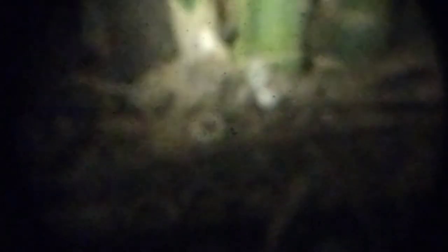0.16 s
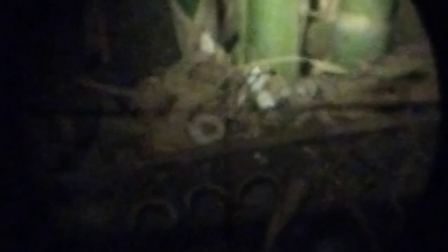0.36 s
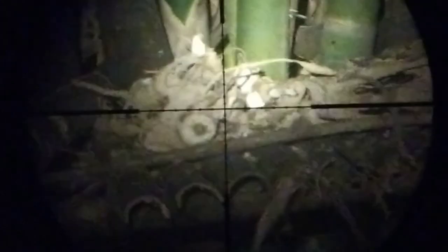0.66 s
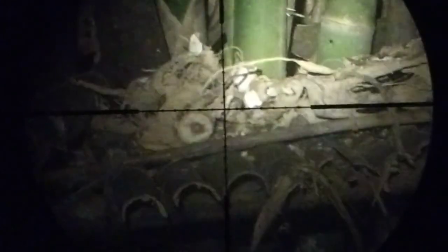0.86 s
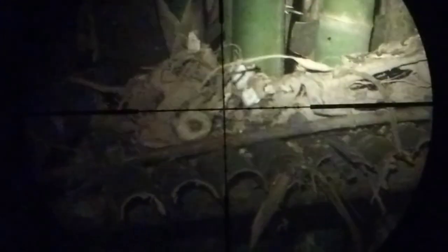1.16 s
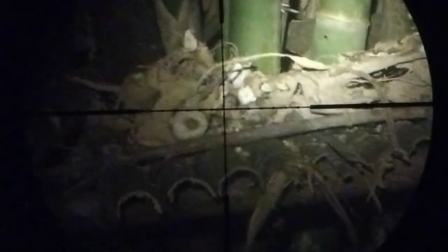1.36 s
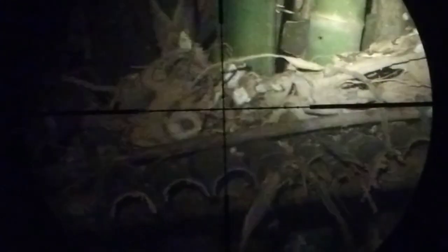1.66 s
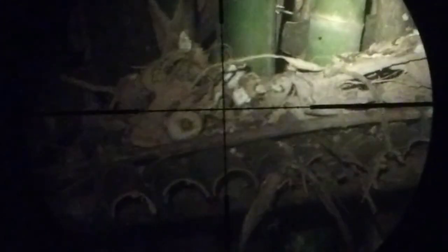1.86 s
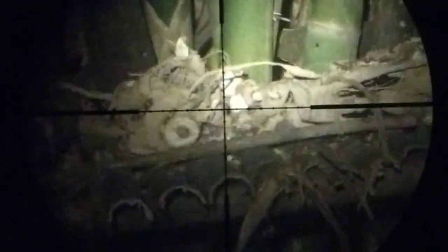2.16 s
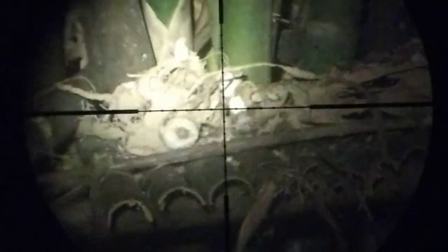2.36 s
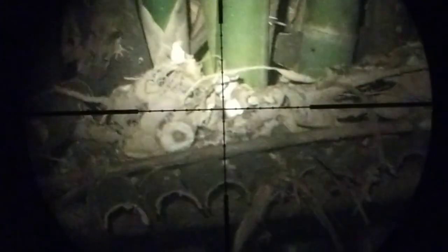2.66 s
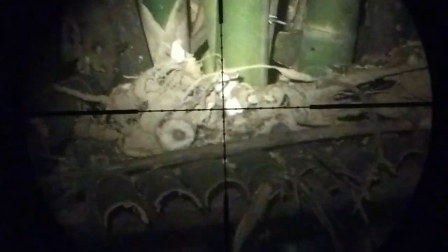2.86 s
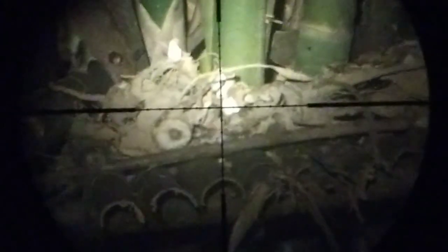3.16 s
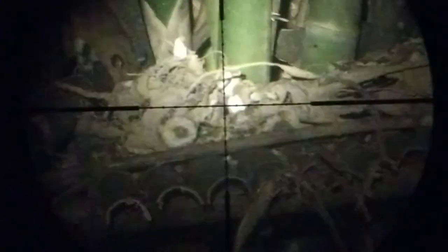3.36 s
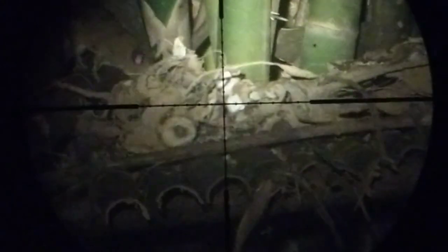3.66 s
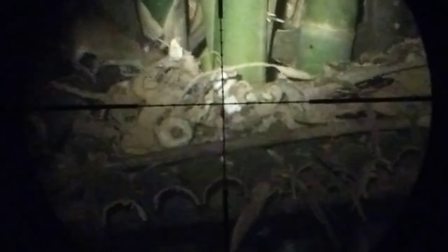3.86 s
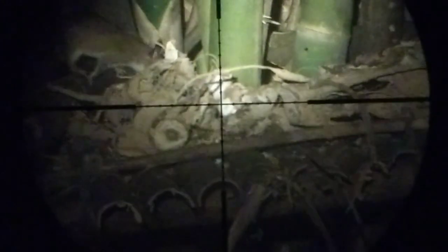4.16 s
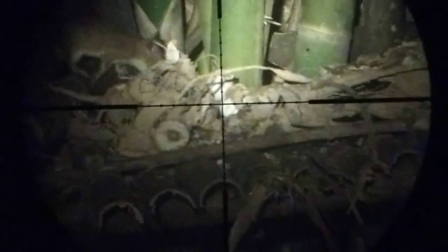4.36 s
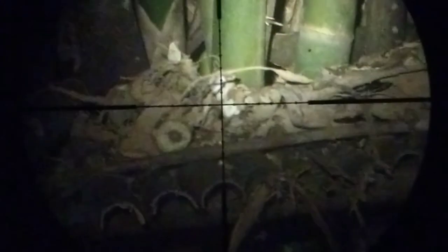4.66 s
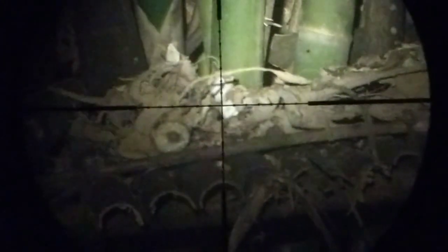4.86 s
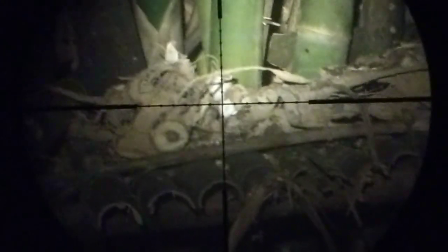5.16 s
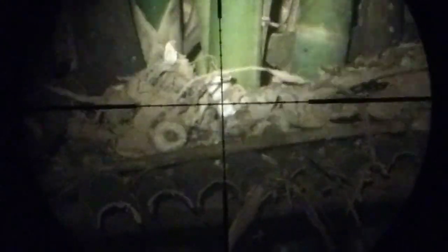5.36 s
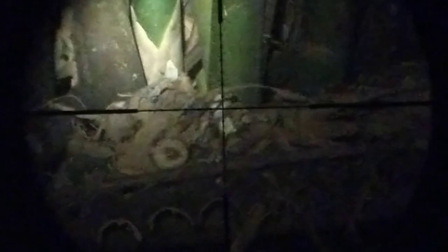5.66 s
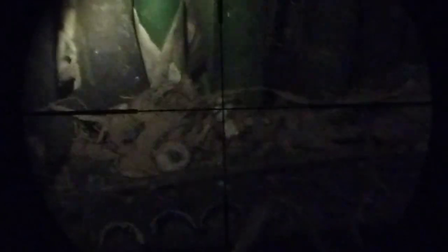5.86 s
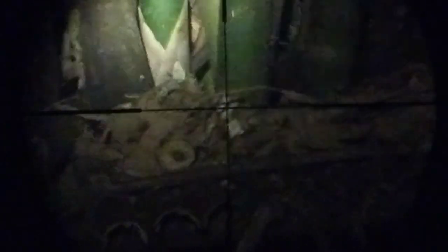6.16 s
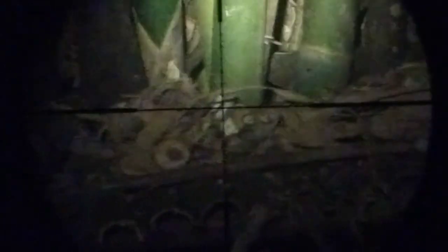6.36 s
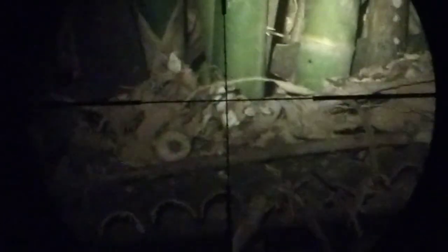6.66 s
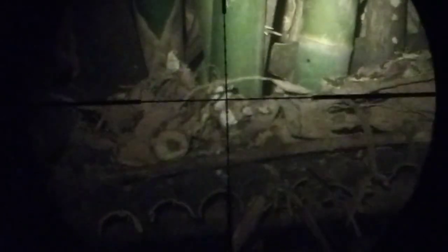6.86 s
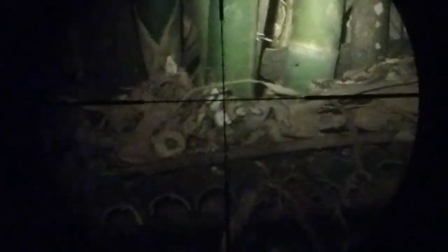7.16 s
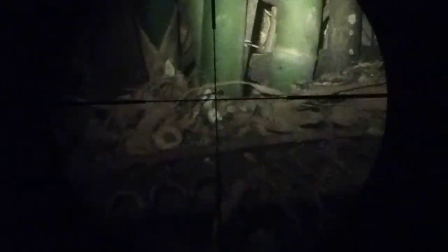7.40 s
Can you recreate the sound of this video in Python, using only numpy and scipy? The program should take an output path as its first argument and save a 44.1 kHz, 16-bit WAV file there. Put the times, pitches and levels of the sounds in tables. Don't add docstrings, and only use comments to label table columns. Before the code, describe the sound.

A night garden full of insects runs unbroken from 0 to about 7.5 seconds, over faint air and microphone hiss. Two cicadas dominate, each giving fast, dry, rattling chirps of about eight to ten strokes, swelling and stopping, centred around 4.5 to 5 kHz. One repeats every 0.55 seconds, the other slightly slower, so they alternate, overlap and separate again. Below, crickets make soft pure trills near 2.5 kHz, the nearest in paired short phrases; above, a katydid's thin rasp throbs near 7.7 kHz. Stems and walls scatter a short echo. Close, dull handling ticks on a rifle come at 0.05, 0.56 and, softer and lower, 2.2 seconds. A faint touch at 5.5 leads to sharp knocks at 5.6 and 5.67, the latter loudest; a last thudding tick falls at 7.0. The insects continue unchanged to the end.

```python
import sys
import numpy as np
from scipy import signal
from scipy.fft import rfft, irfft
from scipy.io import wavfile
from scipy.ndimage import uniform_filter1d

SR = 44100
rng = np.random.default_rng(int(sys.argv[2]) if len(sys.argv) > 2 else 0)


def voltage_ratio(level):
    return 10 ** (np.asarray(level, float) / 20)


def persist_wave(psi):
    counts = np.round(np.clip(psi, -1, 1) * 32767).astype(np.int16)
    wavfile.write(sys.argv[1], SR, np.atleast_2d(counts).T)


N = 332073
TIME = np.arange(N) / SR


def level(x, db):
    return x * voltage_ratio(db) / np.sqrt(np.mean(x ** 2))


def colour(points, size=2048):
    hz, db = np.transpose(points)
    grid = np.maximum(np.arange(size // 2 + 1) * SR / size, 1)
    cepstrum = irfft(np.log(voltage_ratio(np.interp(np.log(grid), np.log(hz), db))))
    cepstrum[1:size // 2] *= 2
    cepstrum[size // 2 + 1:] = 0
    return irfft(np.exp(rfft(cepstrum)))


def through(x, response):
    return signal.fftconvolve(x, response)[:N]


def band(x, low_hz, high_hz):
    return signal.sosfilt(signal.butter(8, [low_hz, high_hz], "band", fs=SR, output="sos"), x)


def clicks(times, gains):
    return np.bincount(np.clip((times * SR).astype(int), 0, N - 1), gains, N)


def walk(rate):
    hold = int(SR / rate)
    held = np.repeat(rng.standard_normal(N // hold + 1), hold)
    return 1.3 * uniform_filter1d(uniform_filter1d(held, hold), hold)[:N]


def grit(rate, spread_db):
    chance = rng.random((3, N))
    happens = chance[0] < rate / SR
    size = voltage_ratio(-spread_db * np.log(1 - chance[2]))
    return happens * np.sign(chance[1] - .5) * size


def rasp(hz, width_hz, rate, spread_db):
    low = signal.butter(3, width_hz / 2, fs=SR, output="sos")
    in_phase = signal.sosfilt(low, grit(rate, spread_db))
    quadrature = signal.sosfilt(low, grit(rate, spread_db))
    carrier = np.exp(2j * np.pi * np.cumsum(hz) / SR)
    return level(np.real((in_phase + 1j * quadrature) * carrier), 0)


def bursts(rows, rise, echoes):
    out, t = np.zeros(N + SR), TIME[:1024]
    shape = (t / rise) * np.exp(1 - t / rise) * np.hanning(2048)[1024:]
    for (s, db, hz), chance in zip(rows, rng.standard_normal((len(rows), 8))):
        for k, (delay, echo_db) in enumerate([(0.0004, 0)] + echoes):
            start = int((s + delay * (1 + .15 * chance[k])) * SR)
            tone = np.sin(2 * np.pi * hz * (1 + 0.013 * chance[4 + k] * k) * t)
            out[start:start + len(t)] += voltage_ratio(db + echo_db) * shape * tone
    return out[:N]


# (frequency [Hz], density [dB per Hz])
NIGHT = [(15, -60.5), (25, -34.5), (194, -25), (287, -12), (1460, -20.5), (1610, -18), (1920, -16),
         (2220, -24.5), (2520, -5.5), (2780, -15.5), (3640, -18), (4660, -10), (6920, -17), (7820, -8),
         (9070, -25.5), (11800, -49), (20000, -120)]


def night():
    hiss = level(through(rng.standard_normal(N), colour(NIGHT, size=8192)), -62.3)
    return band(hiss, 35, 9100) + voltage_ratio(-100) * np.sin(2 * np.pi * 100 * TIME)


def strokes(chirps, effort):
    scatter_db, scatter_hz, scatter_s = 1.4, 60, .0006
    top_hz, sag_hz_per_db, lowest_hz = 4850, 40, 4400
    first, gap, peak_db = np.transpose(chirps)[:, :, None]
    number, db = np.transpose(effort)
    k = np.arange(effort[-1][0] + 1)
    effort_db = np.interp(k, number, db)
    chance = rng.standard_normal((len(chirps), 3, 12))[:, :, :len(k)]
    hurry = .0008 * np.maximum(k - 6, 0) ** 2
    s = first + gap * k - hurry + scatter_s * chance[:, 1]
    hz = np.maximum(top_hz + sag_hz_per_db * effort_db, lowest_hz) + scatter_hz * chance[:, 2]
    return np.array([s, peak_db + effort_db + scatter_db * chance[:, 0], hz])


def swell(chirps, peak_s, hold_s, rise, fall, db, sac_hz):
    coarse = TIME[::128]
    late = coarse - np.array(chirps)[:, :1] - peak_s
    db = np.array(chirps)[:, -1:] + db + rise * np.minimum(late, 0) - fall * np.maximum(late - hold_s, 0)
    power = np.interp(TIME, coarse, np.sum(voltage_ratio(db) ** 2, axis=0))
    return np.array([power, power * sac_hz])


# (frequency [Hz], density [dB per Hz])
DRUM = [(1800, -36), (2250, -6.5), (2900, -11.5), (3600, -13.5), (4100, -4.5), (4700, 2), (5300, -9.5),
        (5850, -5.5), (6300, -11.5), (7800, -15), (9000, -30.5), (10800, -41), (12500, -49.5), (15500, -40)]
# (frequency [Hz], level [dB])
RINGS = [(3188, -7.5), (4235, -20.5), (4527, 3), (4729, 3), (4941, -36), (5130, 5.5), (5331, 5), (5451, -9),
         (5608, -7), (5820, -15), (5931, -3.5), (6502, -21), (6810, -6)]


def drum_body():
    t = TIME[:4096]
    rings = sum(voltage_ratio(db) * np.sin(2 * np.pi * hz * t + hz) * np.exp(-np.pi * 25 * t) for hz, db in RINGS)
    body = level(rings, -8.0) + level(colour(DRUM, size=len(t)), 0)
    return body / np.sqrt(np.sum(body ** 2))


def drum_strokes(rows, body):
    pops = bursts(rows, 0.0012, [(.0042, -3.0), (.009, -7.0)]) * voltage_ratio(-6.0)
    upper = [(s, db - 14.0 + (hz - 4750) / 40, min(1.13 * hz, 5500)) for s, db, hz in rows]
    pops += bursts(upper, 0.0017, [])
    strokes_s, peak_db, _ = rows.T
    cracks = through(clicks(strokes_s, voltage_ratio(peak_db + 2.5)), body)
    return pops + band(cracks, 1500, 8500)


# (stroke number, level re chirp peak [dB], pitch [Hz])
RIBS = [
    (0, -14, 3950),
    (6, -18, 3190),
    (9, -17, 3900),
]
# (time [s], peak level [dB], pitch [Hz])
STRAY_SNAPS = [(.366, -42, 3800), (2.121, -43, 3920), (2.149, -39, 3900), (4.4055, -38, 3980)]


def rib_snaps(slow):
    snaps = []
    for k, db, hz in RIBS:
        for s, chirp in zip(slow[0, :, int(k)], SLOW):
            snaps.append((s, chirp[-1] + db + 3.0 * rng.standard_normal(), hz))
    return bursts(snaps + STRAY_SNAPS, .0014, []) * voltage_ratio(-3.5)


# (middle [s], level [dB])
DISTANT = [(-.05, -58), (.53, -60), (1.2, -55), (1.76, -55), (2.33, -55), (2.88, -57), (3.5, -56.5),
           (4.07, -62)]


def buzz(rows, body):
    loud_buzz = swell(LOUD, peak_s=.135, hold_s=.05, rise=95, fall=140, db=-12, sac_hz=4680)
    slow_buzz = swell(SLOW, peak_s=.12, hold_s=.145, rise=80, fall=150, db=-18.5, sac_hz=4830)
    distant_buzz = swell(DISTANT, peak_s=-.05, hold_s=.1, rise=120, fall=120, db=0, sac_hz=4760)
    power, pull = loud_buzz + slow_buzz + distant_buzz
    envelope, sac_hz = np.sqrt(power + voltage_ratio(-74) ** 2), pull / power

    far = through(level(grit(6000, 1.5), 0), body)
    blur = band(far, 1516, 5860) * envelope * voltage_ratio(-5.3 + 0.76 * walk(40))
    sac = rasp(4740 + 2.4 * (sac_hz - 4750), 380, 1500, 0.87)
    upper = rasp(5380 + 60 * walk(8), 450, 1500, 0.87) * np.sqrt(slow_buzz[0]) * voltage_ratio(-7)

    strokes_s, peak_db, _ = rows.T
    shake = through(clicks(strokes_s, voltage_ratio(peak_db - 14.0)), np.exp(-TIME[:4096] / .006))
    rattle = band((far + voltage_ratio(-7.0) * sac) * shake, 1750, 7380)

    loud_shine = swell(LOUD, peak_s=.08, hold_s=.14, rise=230, fall=200, db=-52, sac_hz=0)
    slow_shine = swell(SLOW, peak_s=.13, hold_s=.14, rise=150, fall=230, db=-56, sac_hz=0)
    treble = np.sqrt((loud_shine + slow_shine)[0] + voltage_ratio(-106) ** 2)
    shine = band(far, 6210, 17000) * treble * voltage_ratio(37.0 + 1.8 * walk(30)) * (1 + voltage_ratio(42.0) * shake)
    return rattle + blur + sac * envelope * voltage_ratio(-9.8) + upper + shine


# (first stroke [s], stroke gap [s], peak level [dB])
LOUD = [(-.284, .027, -38), (.26, .027, -31), (.7945, .027, -30.5), (1.354, .0278, -30.5),
        (1.89, .0268, -30.5), (2.4335, .0275, -30), (2.984, .0278, -31), (3.535, .0265, -30),
        (4.082, .027, -29.7), (4.6235, .027, -29), (5.165, .028, -29), (5.707, .0273, -30),
        (6.25, .028, -30), (6.797, .0283, -30), (7.3365, .027, -30)]
# (first stroke [s], stroke gap [s], peak level [dB])
SLOW = [(.154, .0266, -32), (.7515, .0264, -33.5), (1.319, .0266, -33), (1.891, .027, -33),
        (2.458, .027, -33), (3.032, .0262, -32), (3.598, .0272, -32), (4.17, .0265, -32),
        (4.7343, .0266, -31), (5.305, .0262, -32), (5.8785, .0274, -31), (6.449, .027, -31),
        (7.028, .0276, -31)]
# (stroke number, level re chirp peak [dB])
LOUD_EFFORT = [(0, -21), (2, -9), (4, -3), (6, -2), (7, -8)]
SLOW_EFFORT = [(0, -13), (2, -5.5), (4, -1.5), (7, -.5), (9, -4.5)]


def cicadas():
    body = drum_body()
    slow = strokes(SLOW, SLOW_EFFORT)
    loud = strokes(LOUD, LOUD_EFFORT)
    rows = np.hstack([loud.reshape(3, -1), slow.reshape(3, -1)]).T
    rows = rows[(rows[:, 0] > 0) & (rows[:, 0] < TIME[-1])]
    return drum_strokes(rows, body) + rib_snaps(slow) + buzz(rows, body)


# (pitch [Hz], pulse rate [per s], level [dB])
CRICKETS = [
    (2403, 37.5, -69),
    (2490, 17, -69.5),
    (2530, 48, -67.5),
    (2605, 43, -72),
]


def far_crickets():
    far, drift_hz = 0, 25 * walk(2.5)
    for hz, rate, db in CRICKETS:
        beat = 2 * np.pi * np.cumsum(rate * (1 + 0.03024 * walk(3))) / SR + 6 * rng.random()
        gate = (.5 + .5 * np.sin(beat)) ** 2.1 * voltage_ratio(2.5 * walk(5))
        tone = np.sin(2 * np.pi * np.cumsum(hz + drift_hz + 6 * walk(15)) / SR)
        far = far + level(gate * tone, db)
    return far * voltage_ratio(-4.5)


# (time [s], throbs so far, level [dB], throb depth [dB])
KATYDID = [(.04, -.5, -60, 5), (.21, 0., -59, 4), (1.0, 2., -59, 3), (2.53, 6., -58, 3),
           (5.3, 14., -58, 1.5), (6.04, 16., -58, 4), (6.37, 17., -59, 6.5), (7.04, 19., -58, 3),
           (7.5, 20., -59, 3)]


def katydid():
    s, *columns = np.transpose(KATYDID)
    throbs, db, depth_db = (np.interp(TIME, s, c) for c in columns)
    db = db + depth_db * np.cos(2 * np.pi * throbs)
    mirror_hz = 7720 + 70 * walk(4)
    return rasp(mirror_hz, 480, 900, 0.57) * voltage_ratio(db - 3.0 + 1.3 * walk(25))


def garden(x):
    t60_s, first_echo_s = 0.38, .006
    t = TIME[:SR // 2]
    echoes = rng.standard_normal(len(t)) * voltage_ratio(-60 * t / t60_s) * (t > first_echo_s)
    return band(through(x, level(echoes, -10 * np.log10(len(t)))), 1200, 8940)


# (time [s], peak level [dB], pitch [Hz], thud level [dB], ring [s])
TICKS = [
    (0.049, -49.5, 1430, -68, 0.016),
    (0.562, -47, 1440, -66, 0.019),
    (2.196, -55, 993, -77, 0.017),
    (5.495, -69, 650, -74, 0.012),
    (5.607, -47, 792, -77, 0.019),
    (5.665, -41, 1380, -60.5, 0.014),
    (7.008, -52, 1320, -55.5, 0.016),
]


def ticks():
    out, t = np.zeros(N + SR), TIME[:4096]
    shell = signal.butter(3, [680, 4400], "band", fs=SR, output="sos")
    for s, db, hz, thud_db, ring in TICKS:
        first = np.sin(2 * np.pi * 1.24 * hz * t) * np.exp(-t / 0.00027)
        second = np.sin(2 * np.pi * 0.936 * hz * t) * voltage_ratio(-60 * t / max(ring, .004))
        scrape = rng.standard_normal(len(t)) * np.exp(-t / .0015)
        contact = voltage_ratio(7.0) * first + voltage_ratio(-6.0) * scrape
        contact = contact + voltage_ratio(-5.0) * np.roll(second, 92)
        knock = signal.sosfilt(shell, contact)
        knock = knock + voltage_ratio(-39) * np.sin(2 * np.pi * 85 * t) * (t / .02) * np.exp(1 - t / 0.016)
        thud = np.sin(2 * np.pi * 430 * t) * np.exp(-t / 0.0095) * np.minimum(t / 0.0028, 1)
        start = int(s * SR)
        out[start:start + len(t)] += voltage_ratio(db) * knock + voltage_ratio(thud_db + 3.0) * thud
    return out[:N]


# (time of a phrase [s], time of the next phrase [s])
PHRASES = [(.123, .339), (.557, .756), (.96, 1.171), (1.398, 1.61), (1.836, 2.03), (2.268, 2.465),
           (2.68, 2.875), (3.102, 3.314), (3.525, 3.735), (3.951, 4.147), (4.361, 4.587), (4.797, 5.018),
           (5.226, 5.435), (5.63, 5.842), (6.06, 6.266), (6.484, 6.696), (6.893, 7.102), (7.31, 7.52)]
# (offset [s], peak level [dB], pitch [Hz])
NOTES = [
    (-.07, -53.5, 2610),
    (-.048, -53.5, 2575),
    (-.026, -54, 2535),
    (-.006, -50, 2490),
    (.046, -51.5, 2525),
    (.072, -58, 2500),
    (.098, -54, 2480),
]


def near_cricket():
    near = []
    starts = np.ravel(PHRASES)
    chance = rng.standard_normal((len(starts), 2, len(NOTES)))
    for at, phrase_chance in zip(starts, chance):
        for (s, db, hz), a, b in zip(NOTES, *phrase_chance):
            near.append((at + s, db + 1.2 * a, hz + 15 * b))
    return bursts(near, 0.0048, [])


def scene():
    insects = cicadas() + far_crickets() + near_cricket() + katydid()
    insects = signal.sosfilt(signal.butter(4, 1500, "high", fs=SR, output="sos"), insects)
    return (insects + voltage_ratio(-7) * garden(insects) + ticks() + night())[None]


def mute_faint_treble(x, edges_hz, limit_db):
    spectrum, hz = rfft(x), np.arange(N // 2 + 1) * SR / N
    out = irfft(spectrum * (hz < edges_hz[0]), N)
    for low, high in zip(edges_hz, edges_hz[1:]):
        part = irfft(spectrum * (hz >= low) * (hz < high), N)
        band_limit_db = limit_db - 1.5 * (low - edges_hz[0]) / 1000
        heard = uniform_filter1d(part ** 2, 1536) > voltage_ratio(band_limit_db) ** 2
        out = out + part * uniform_filter1d(uniform_filter1d(1. * heard, 256), 256)
    return out + irfft(spectrum * (hz >= edges_hz[-1]), N)


def low_pass(x):
    return signal.sosfilt(signal.butter(12, 15500, fs=SR, output="sos"), x)


def record(dry):
    gated = mute_faint_treble(dry[0], [9250, 9700, 10400, 11000, 11800], -96.3)
    return low_pass(gated)


dry = scene()
out = record(dry)
persist_wave(out)
```